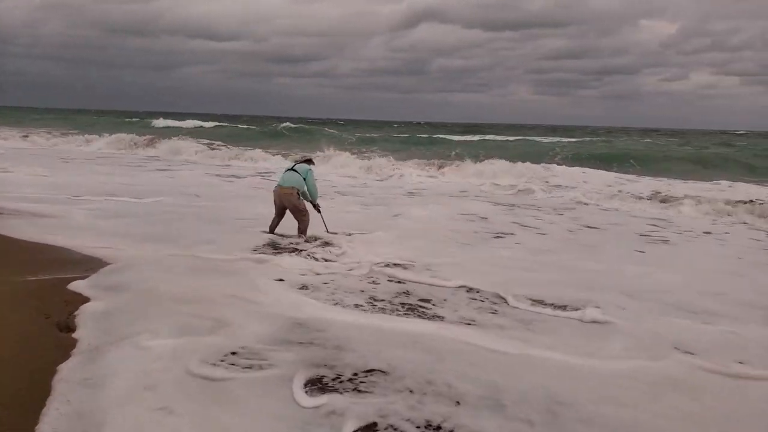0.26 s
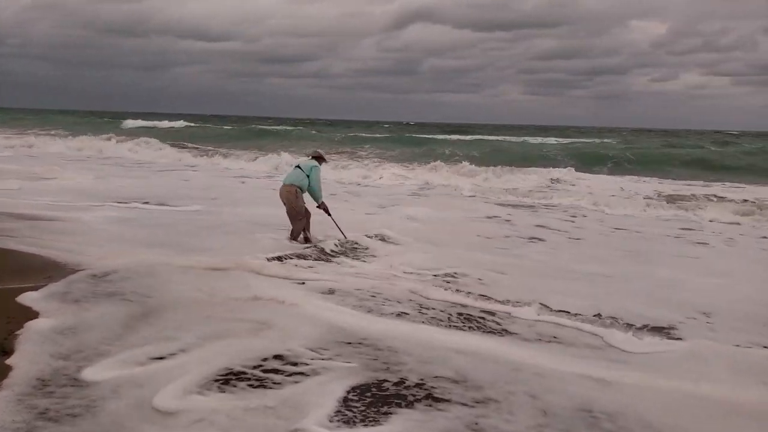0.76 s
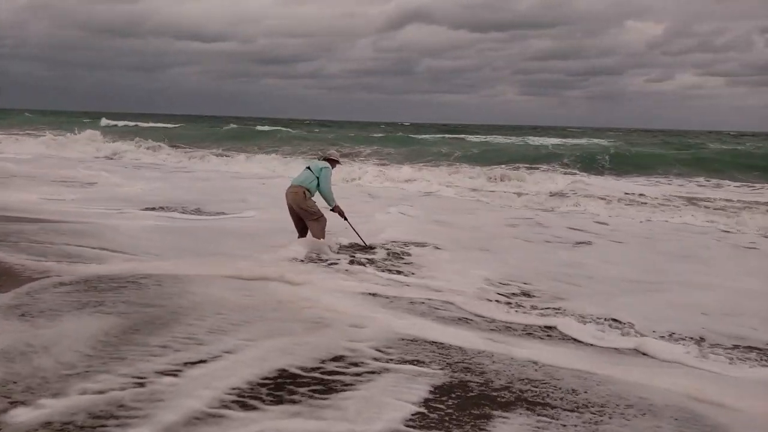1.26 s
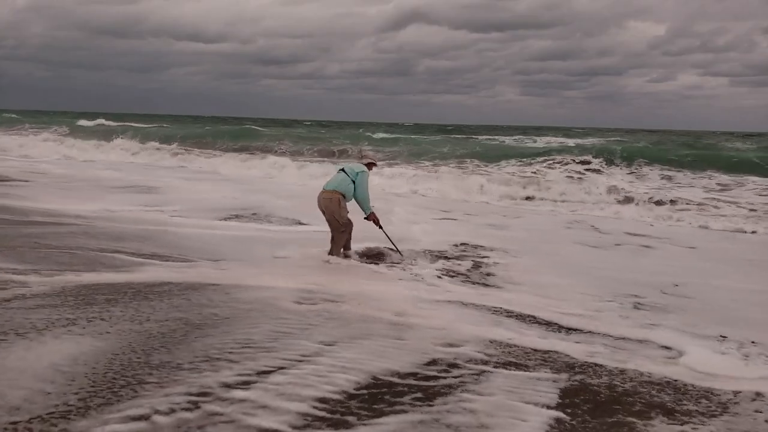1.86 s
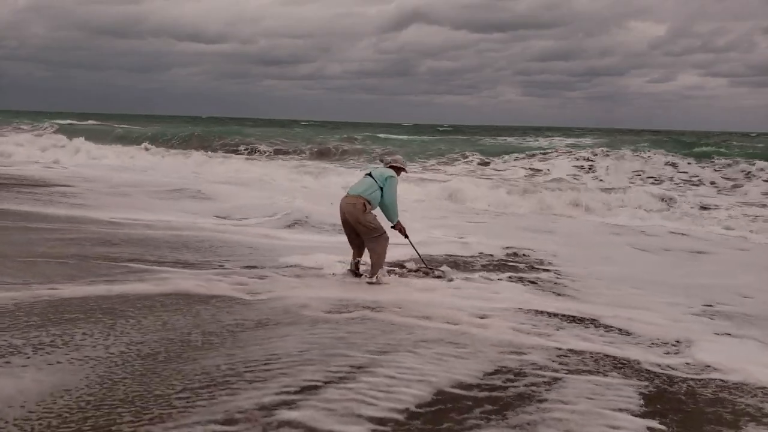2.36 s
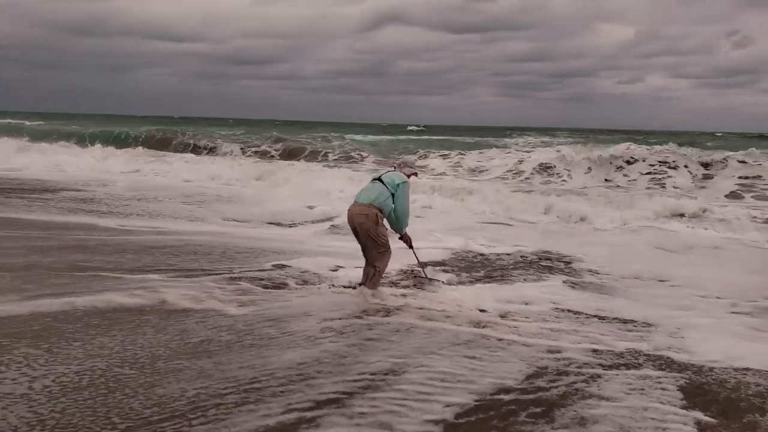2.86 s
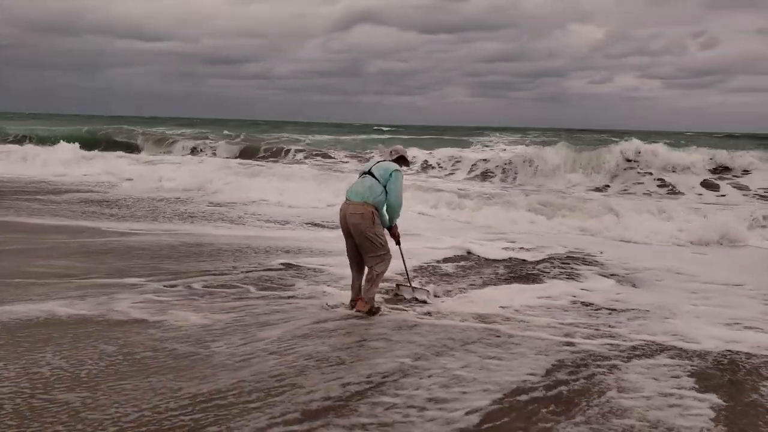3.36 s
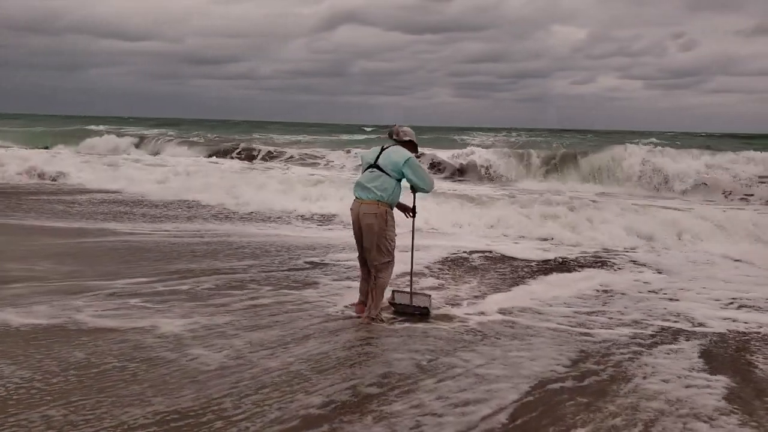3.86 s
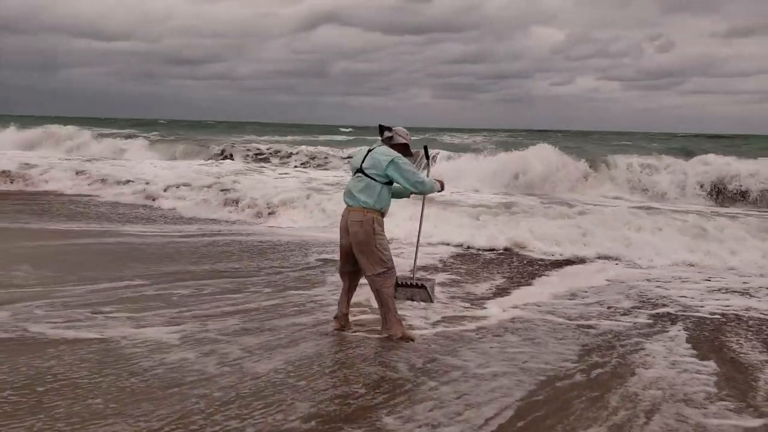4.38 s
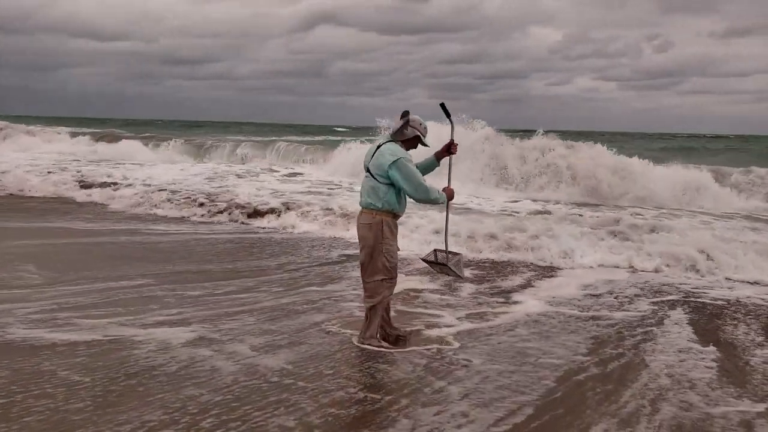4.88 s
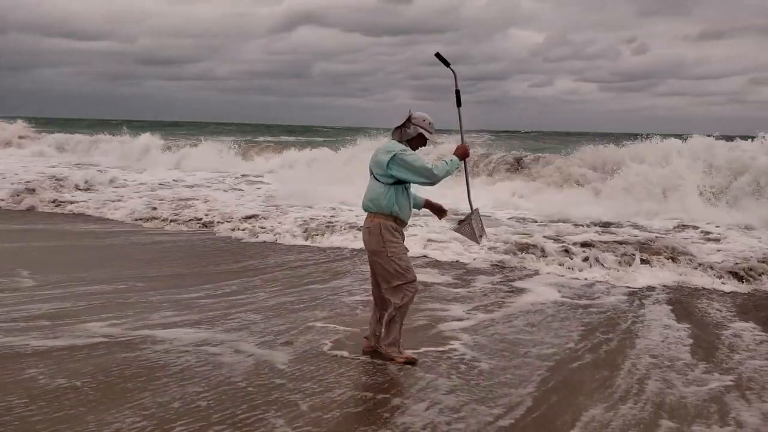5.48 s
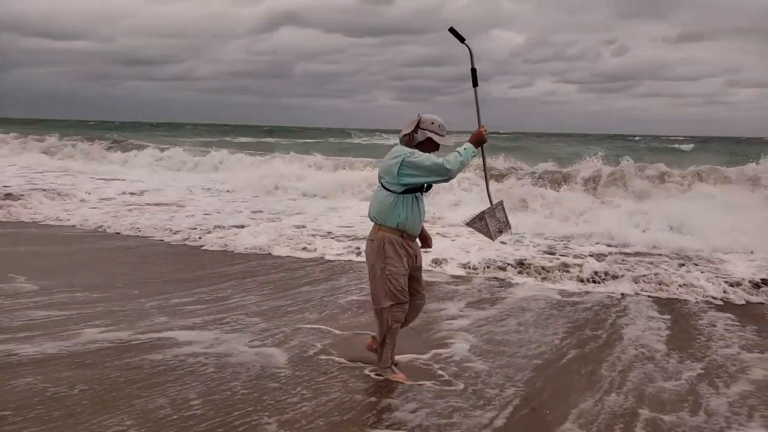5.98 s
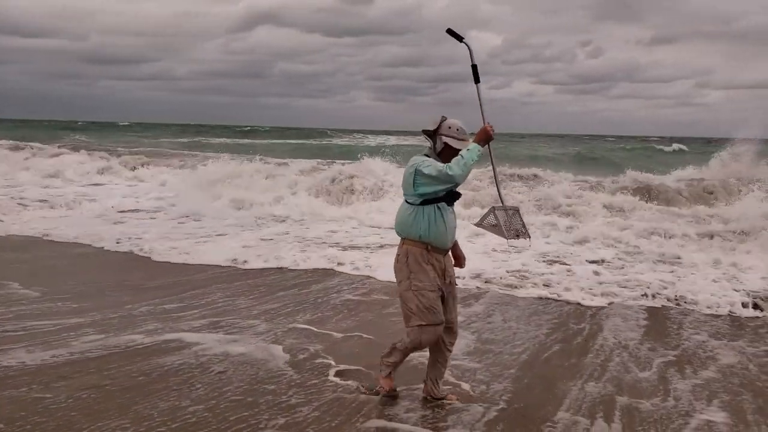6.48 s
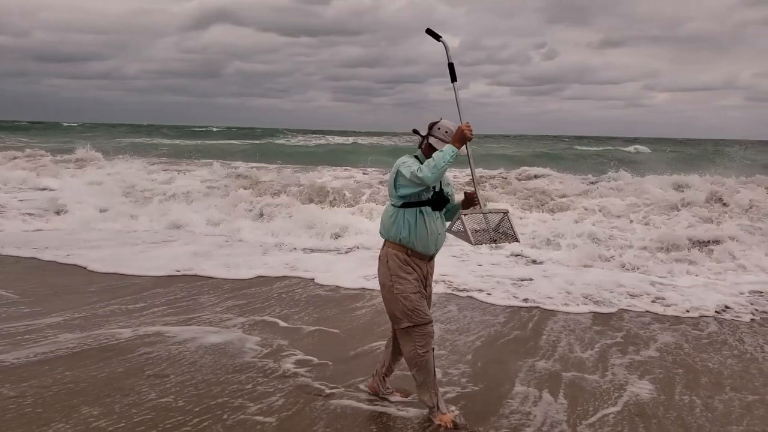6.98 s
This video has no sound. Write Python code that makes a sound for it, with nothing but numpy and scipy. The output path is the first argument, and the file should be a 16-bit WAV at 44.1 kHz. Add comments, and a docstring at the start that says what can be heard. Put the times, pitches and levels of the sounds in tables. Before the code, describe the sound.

Outdoor stereo on a beach, with wind striking a bare camera microphone. From 0 to about 1.2 s a dense, harsh, nearly saturated gust tears at the right channel, surging with tiny dropouts; the left carries mainly low rumble and faint surf. The gust releases suddenly. Until about 2.4 s a hollow, airy low-mid note fades slowly on the right beneath a fine crackling flutter, over soft rumble, with small thumps after 2 s. It is quietest around 2.6 s. From 2.8 to 3.9 s the wind turns head-on, bringing buffets to both sides. A wave gathers from 3.3 s, roaring and crackling strongest near 5.5 s, its bright foam hissing up the sand and easing afterward. Dense knocks, thumps and sharp right-side snaps cluster from 5.3 to 5.9 s, hit hard again at 6.3 s, and continue irregularly to about 7.2 s. Occasional tiny drops tick on the housing.

```python
"""Strong wind on a camera's two microphone ports, on a beach with breaking surf.
A gust, a dense stream of pressure dips, tears across the right port for the first second, then eases to
a flutter of small eddies over a low rumble of filtered noise; a hollow note lingers for a while.
A wave breaks and its foam hisses up the sand, both built from countless bubble clicks, while the wind
turns head-on and buffets both ports in surges, with knocks, thumps and sharp snaps."""
import sys
import numpy as np
from scipy import signal
from scipy.fft import rfft, irfft, next_fast_len
from scipy.io import wavfile
from scipy.ndimage import uniform_filter1d

SR = 44100
rng = np.random.default_rng(int(sys.argv[2]) if len(sys.argv) > 2 else 0)


def master_out(mix):
    """Clip the mix to full scale and print it as 16-bit PCM to the path in sys.argv[1]."""
    frames = np.transpose(np.atleast_2d(mix))
    ceiling = np.clip(frames, -1, 1)
    pcm = np.round(ceiling * 32767).astype(np.int16)
    wavfile.write(sys.argv[1], SR, pcm)


N = 319014
TIME = np.arange(N) / SR
GUST_END_S, GUST_RELEASE_S = 1.165, 0.012  # when the opening gust lets go, and how fast

# spectrum of whirls in head-on wind and in the wakes of large eddies: [f/Hz, level/dB]
BUFFET_SPECTRUM = [(60, -32), (250, -8), (420, -3), (580, -5.5), (780, 1.5), (1000, -3), (1400, -12.5),
                   (2500, -18), (6000, -64)]
# spectrum of a drop ticking on the housing: [f/Hz, level/dB]
DROP_SPECTRUM = [(500, -36), (2000, 11), (5000, 12), (8600, -11), (11500, 0), (15800, -17)]


def undb(db):
    """Decibels to gain."""
    return 10 ** (np.asarray(db) / 20)


def port_gains(db, pan_db):
    """Gains of the left and right port, pan_db (left minus right) apart around a middle level."""
    return undb(db + np.array([[pan_db], [-pan_db]]) / 2)


def unit(x):
    """Scale to rms 1."""
    return x / np.sqrt(np.mean(x ** 2))


def even(x, span_s):
    """Hold a sound at a steady strength over spans of this length; its fine grain stays."""
    power = uniform_filter1d(x ** 2, max(int(span_s * SR), 2))
    return x / np.sqrt(power + 1e-6)


def colour(x, points, ring=0):
    """Filter to a (Hz, dB) spectrum at rms 1; ring 0 keeps pulses symmetric, ring 1 lets them ring on after."""
    hz, db = np.transpose(points)
    size = next_fast_len(N)
    f = np.maximum(np.abs(np.fft.fftfreq(size, 1 / SR)), 1)
    gain = undb(np.interp(np.log(f), np.log(hz), db))
    # the Hilbert transform of the log gain is the minimum phase
    log_gain = signal.hilbert(np.log(gain))[:size // 2 + 1]
    response = np.exp(log_gain.real - 1j * ring * log_gain.imag)
    return unit(irfft(rfft(x - x.mean(), size) * response, size)[:N])


def walk(rate):
    """Smooth chance that changes about rate times a second; rms 1."""
    k = max(int(SR / rate), 2)
    levels = np.clip(rng.standard_normal(N // k + 2), -2, 2)
    steps = np.repeat(levels, k)[rng.integers(k):]
    return unit(uniform_filter1d(steps, k)[:N])


def flicker(rate, depth_db):
    """A gain that wanders at random; rms 1."""
    return unit(undb(depth_db * walk(rate)))


def curve(table):
    """Join (s, value) rows by straight lines."""
    return np.interp(TIME, *np.transpose(table))


def ramp(start_s, length_s):
    """Rise from 0 to 1."""
    return np.clip((TIME - start_s) / length_s, 0, 1)


def swells(rows, squareness):
    """A dB curve from (s, width at half height s, dB) swells; higher squareness gives steeper flanks."""
    grid = TIME[::SR // 1000]
    db = sum(db / (1 + np.abs(2 * (grid - s) / length) ** (2 * squareness)) for s, length, db in rows)
    return np.interp(TIME, grid, db)


def vortices(rate, core_ms, core_spread, spread_db):
    """Whirls drift over a port; each low-pressure core is a bell-shaped dip, briefer for a smaller whirl."""
    count = int(rate * N / SR)
    at = rng.integers(0, N, count)
    size, core = np.clip(rng.standard_normal((count, 2)), -2.2, 2.2).T
    taps = np.arange(-128, 129)
    # samples from the centre of a dip to half its depth
    radius = SR / 1000 * np.broadcast_to(core_ms, N)[at] * np.exp(core_spread * core)
    bells = np.hanning(len(taps)) / (1 + (taps / radius[:, None]) ** 2)
    dips = -undb(spread_db * size)[:, None] * bells
    return np.bincount(((at[:, None] + taps) % N).ravel(), dips.ravel(), N)


def bubbles(rate, spread_db):
    """Countless bursting bubbles: tiny clicks, a few of them larger."""
    count = int(rate * N / SR)
    size = undb(spread_db * np.minimum(rng.exponential(size=count), 5)) * rng.standard_normal(count)
    return np.bincount(rng.integers(0, N, count), size, N)


def swing(turns, cycles, phases):
    """The pressure swing of one passing eddy, some cycles long, with its own phase at each port."""
    return -np.cos(2 * np.pi * turns + phases[:, None]) * np.exp(-(turns / cycles) ** 2)


def surf(wind_db, roar_right_db=-2, foam_right_db=-2.5, wind_hiss_left_db=-26, wind_hiss_right_db=-37):
    """The breaker roars as it folds over, froth crackles, foam fizzes up the sand; wind adds to the hiss."""
    # the wave breaks and runs up the sand, as at the left port:
    # [t/s, breaker roar level/dB, froth crackle level/dB, foam hiss level/dB]
    wave = [(1.2, -54.5, -57, -60), (2.4, -55, -58.5, -64), (3.25, -52, -55.5, -63),
            (3.6, -46.5, -53.5, -58.5), (4.0, -43, -49, -53.5), (4.5, -40, -47, -52),
            (4.85, -40, -42.5, -49), (5.5, -37, -41.5, -47), (6.2, -41, -48, -50.5),
            (7.2, -41.5, -50.5, -55.5)]
    # spectra of the three layers: [f/Hz, level/dB]
    roar_spectrum = [(40, -15), (200, -10.5), (500, 0), (850, 9), (1300, 5), (2000, -6.5), (3700, -14),
                     (7000, -46)]
    froth_spectrum = [(700, -12), (1600, -1), (2600, 1), (3500, 0.5), (4200, -3.5), (5000, -11),
                      (7000, -26.5), (8600, -49)]
    foam_spectrum = [(1500, -30), (5000, -0.5), (7200, -2), (8600, -9), (10000, -4.5), (11200, 0.5),
                     (13500, 3), (15800, -4.5)]
    s, *columns = np.transpose(wave)
    roar, froth, foam = (undb(np.interp(TIME, s, c)) for c in columns)
    left = (0, 0, wind_hiss_left_db)
    right = (roar_right_db, foam_right_db, wind_hiss_right_db)
    out = []
    for roar_db, foam_db, hiss_db in (left, right):
        body = colour(bubbles(rate=14000, spread_db=3.5), roar_spectrum) * flicker(rate=24, depth_db=2.9)
        crackle = colour(bubbles(rate=5000, spread_db=3.0), froth_spectrum) * flicker(rate=27, depth_db=1.8)
        fizz = colour(bubbles(rate=18000, spread_db=0.5), foam_spectrum) * flicker(rate=33, depth_db=1.2)
        breaker = undb(roar_db) * (roar * body + froth * crackle)
        hiss = np.hypot(foam * undb(foam_db), undb(wind_db + hiss_db))  # foam and wind add in power
        out.append(breaker + hiss * fizz)
    return np.array(out)


def mist():
    """Fine drops land about fifty times a second."""
    return colour(bubbles(rate=50, spread_db=4), DROP_SPECTRUM, ring=1)


def spray(mist_db=-68, tick_s=0.011):
    """Wind-borne drops tick on the housing: a few clear decaying ones, and many fine ones to windward."""
    # clear drops: [t/s, level/dB, left minus right/dB]
    clear_drops = [(1.416, -46, -16), (3.065, -40, 5), (4.215, -39, 5)]
    grain = colour(rng.standard_normal(N), DROP_SPECTRUM) / 2
    out = np.zeros((2, N))
    for s, db, pan_db in clear_drops:
        near = slice(int(s * SR), int(s * SR) + SR // 50)
        tick = grain[near] * np.exp((s - TIME[near]) / tick_s)
        out[:, near] += tick * port_gains(db, pan_db)
    out[1] += undb(mist_db) * mist()
    return out


def pressure(head_on, deep_hz=47, deep_loss_db=16):
    """Slow pressure swings at one port; head-on wind loses those below deep_hz."""
    # rumble spectrum: [f/Hz, level/dB]
    rumble_spectrum = [(15, -28), (30, -2.5), (60, 0), (90, 1), (130, 0), (170, -2), (250, -5), (400, -9),
                       (600, -22.5), (1000, -39), (2000, -67), (5000, -79)]
    swings = colour(rng.standard_normal(N), rumble_spectrum)
    upper = signal.sosfiltfilt(signal.butter(2, deep_hz, "high", fs=SR, output="sos"), swings)
    return upper + (swings - upper) * undb(-deep_loss_db * head_on)


def rumble(wind_db, head_on, left_db=5, right_db=4.0, lift_off_db=-37.0, lift_off_slope=1.0, full_db=-39):
    """Large slow eddies press on each port; on the right they come in lumps and die away in weak wind."""
    left = undb(wind_db + left_db) * pressure(head_on) * flicker(rate=45, depth_db=3.0)
    lumps = unit(1 + np.tanh(2.2 * walk(30)))
    # the right port stops growing in strong wind and falls faster in weak wind
    reach_db = np.minimum(wind_db, full_db) - lift_off_slope * np.maximum(lift_off_db - wind_db, 0)
    right = undb(reach_db + right_db) * pressure(head_on) * lumps
    return np.array([left, right])


def knocks(cycles=0.68, phase_spread=1.34, level_db=-1):
    """Slower eddies land on the ports as dull knocks, each a short pressure swing."""
    # slower eddies: [t/s, level before level_db/dB, pitch f/Hz, left minus right/dB]
    slow_eddies = [(0.97, -16, 132, 15.5), (3.563, -29, 92, 1), (3.845, -29, 100, 5), (4.274, -23, 159, 8),
                   (4.58, -23.5, 171, 0), (4.746, -20, 150, -2), (4.892, -22, 181, -1),
                   (5.038, -20, 192, 2), (5.137, -23.5, 204, -11), (5.453, -18, 241, 4),
                   (5.492, -20, 110, 1), (5.625, -30, 170, -3), (5.67, -23.5, 233, -5),
                   (5.856, -25, 190, 2), (6.317, -17.5, 226, 7), (6.335, -23, 131, -2),
                   (6.435, -25, 188, -5), (6.527, -31, 170, 17), (6.727, -23.5, 178, 2),
                   (6.918, -14.5, 223, -1), (6.979, -25.5, 151, -6), (7.119, -29, 130, 8)]
    out = np.zeros((2, N))
    chances = rng.standard_normal((len(slow_eddies), 2))
    for (s, db, pitch_hz, pan_db), chance in zip(slow_eddies, chances):
        near = slice(int(s * SR) - SR // 20, int(s * SR) + SR // 20)
        knock = swing((TIME[near] - s) * pitch_hz, cycles, phase_spread * chance)
        out[:, near] += knock * port_gains(level_db + db, pan_db)
    return out


def thumps(body_hz=190, body_db=-16, wake_s=0.016, phase_spread=0.61, level_db=0.0):
    """A large eddy hits both ports: quick pressure swings on a slower one, then a short turbulent wake."""
    # large eddies: [t/s, level/dB, pitch f/Hz, length/cycles, wake relative to level/dB, left minus right/dB]
    large_eddies = [(2.018, -37, 450, 1, -6, -16), (2.246, -34.5, 570, 1.7, -8, -16),
                    (2.385, -39, 500, 1, -3, -16), (3.551, -24.5, 606, 0.5, -5.5, -8),
                    (3.8, -32, 600, 0.72, -14, -2), (3.951, -19.5, 645, 0.75, -12, -1),
                    (4.25, -28, 850, 1.4, -18, -9), (4.578, -28, 600, 0.69, -4, -4),
                    (4.797, -23, 690, 1.1, -3.5, -1), (4.836, -26, 990, 1.7, -10, -2),
                    (4.884, -25, 845, 1.3, -3.5, -10), (5.083, -20, 890, 1.3, -9.5, -3),
                    (5.099, -23, 850, 1.3, -16, -8), (5.263, -20.5, 675, 1.2, -4.5, -9),
                    (5.318, -11, 700, 1.0, -12.5, -5), (5.385, -26, 616, 0.81, -1, -6),
                    (5.448, -19.5, 465, 1.6, -4.5, -7), (5.459, -23, 655, 2.4, -14, 1),
                    (5.488, -18.5, 623, 0.64, -6, -6), (5.493, -17.5, 870, 1.3, -18, -13),
                    (5.537, -20.5, 886, 0.8, -2, -4), (5.569, -15, 750, 1.2, -10, -1),
                    (5.582, -22.5, 850, 1.1, -7, -6), (5.595, -16, 720, 0.69, -27, 12),
                    (5.653, -18, 840, 1.1, -5.5, -2), (5.669, -21.5, 402, 0.92, -7, -1),
                    (5.703, -26.5, 650, 0.89, -4, -3), (6.215, -25, 750, 1.4, -11, -2),
                    (6.317, -12.5, 810, 0.63, -15.5, 1.5), (6.348, -21.5, 650, 0.65, -15, 2),
                    (6.423, -24, 700, 0.82, -7, 1), (6.461, -25, 750, 2.4, -5, -7),
                    (6.536, -27.5, 990, 1.1, -5, -12), (6.686, -29.5, 930, 1.2, -17, -10),
                    (6.746, -19.5, 1060, 0.51, -24, -11), (6.771, -20.5, 680, 0.81, -6, -3),
                    (6.892, -23, 900, 1.5, -25, -9), (6.921, -26, 556, 1.3, -3.5, -4),
                    (7.042, -26.5, 880, 1.1, -13, -1)]
    out = np.zeros((2, N))
    wakes = np.array([colour(rng.standard_normal(N), BUFFET_SPECTRUM) for _ in range(2)])
    chances = rng.standard_normal((len(large_eddies), 2))
    for (s, db, pitch_hz, cycles, wake_db, pan_db), chance in zip(large_eddies, chances):
        near = slice(int(s * SR) - SR // 100, int(s * SR) + SR // 10)
        t = TIME[near] - s
        quick = swing(t * pitch_hz, cycles, phase_spread * chance)  # nearly in step at the two ports
        slow = swing(t * body_hz, 0.52, chance)
        wake = (t > 0) * np.exp(-np.abs(t) / wake_s) * wakes[:, near]
        thump = quick + undb(body_db) * slow + undb(wake_db) * wake
        out[:, near] += thump * port_gains(level_db + db, pan_db)
    return out


def buffeting(wind_db, left_db=-1, right_db=1):
    """Head-on wind comes in quick bursts that reach both ports together, each with its own whirls."""
    bursts = even(flicker(rate=80, depth_db=5.5), 0.13)
    ports = []
    for _ in range(2):
        whirls = vortices(rate=1500, core_ms=0.19, core_spread=0.61, spread_db=6.5)
        ports.append(colour(whirls, BUFFET_SPECTRUM, ring=0.53))
    return np.array(ports) * undb(wind_db) * bursts * undb([[left_db], [right_db]])


def hollow(start_db=-36, sag_db_per_s=1.5, end_s=2.414, release_s=0.022, hold_s=0.11):
    """After the gust, grazing air blows a hollow note in the right port: a band of noise that slowly fades."""
    # hollow note spectrum: [f/Hz, level/dB]
    hollow_spectrum = [(180, -31), (260, -16), (330, 3), (450, 2), (600, -1.5), (900, -17), (2000, -53)]
    level = undb(start_db - sag_db_per_s * (TIME - GUST_END_S))
    held = ramp(GUST_END_S, GUST_RELEASE_S) - ramp(end_s, release_s)
    note = colour(rng.standard_normal(N), hollow_spectrum) * flicker(rate=44, depth_db=2.0)
    return level * held * even(note, hold_s)


def snaps(trail_ms=4.1, trail_db=-17, level_db=1):
    """A tight whirl crosses the right port as one sharp pressure dip, with a few ms of ragged air behind."""
    # tight whirls: [t/s, level relative to one another/dB]
    tight_whirls = [(2.243, -23.5), (3.996, -21), (4.205, -22), (5.464, -14.5), (5.468, -13), (5.490, -13),
                    (5.527, -22), (5.538, -15), (5.703, -14), (5.717, -19), (5.742, -12), (5.751, -20),
                    (5.835, -25), (5.902, -15), (5.968, -32), (6.049, -18.5), (6.294, -14), (6.304, -17.5),
                    (6.358, -16), (6.834, -16), (7.008, -19), (7.187, -17)]
    # snap spectrum: [f/Hz, level/dB]
    snap_spectrum = [(150, -20), (500, -7), (900, 8), (2000, -1), (4000, -10), (6000, -18.5), (8500, -43)]
    out = np.zeros(N)
    t = TIME[:SR // 50]
    for (s, db), air in zip(tight_whirls, rng.standard_normal((len(tight_whirls), len(t)))):
        trail = undb(trail_db) * air * np.exp(-1000 * t / trail_ms)
        dip = trail - (t == 0)
        out[int(s * SR):][:len(t)] += undb(db) * dip
    shaped = colour(out, snap_spectrum, ring=0.4)
    # the highest peak lands level_db above the strongest row
    return shaped / np.abs(shaped).max() * undb(level_db + max(db for _, db in tight_whirls))


def flutter(sideways_db, level_db=-38.0, afterblow_db=4, settle_s=0.085, hold_s=0.07):
    """Lighter air patters on the right port in a fine, unbroken crackle of whirls, settling after the gust."""
    # flutter spectrum: [f/Hz, level/dB]
    flutter_spectrum = [(40, -69), (250, -25), (420, -4), (580, -8), (780, -1), (1300, -1), (2200, -2),
                        (4000, -3), (6500, -7.5), (8500, -15), (15000, -21)]
    whirls = vortices(rate=1400, core_ms=0.12, core_spread=0.47, spread_db=2.0)
    crackle = colour(whirls, flutter_spectrum, ring=0.38) * flicker(rate=130, depth_db=2.0)
    patter = even(crackle, hold_s)
    settling_db = afterblow_db * np.exp(-np.maximum(TIME - GUST_END_S, 0) / settle_s)
    return undb(level_db + settling_db + sideways_db) * patter


def gust(blowing, sideways_db, lull_db, lull_dulling=1.0, port_hz=5700):
    """A dense stream of whirls tears across the right port; faster air makes smaller, brighter ones."""
    # gust spectrum: [f/Hz, level/dB]
    gust_spectrum = [(30, -39), (120, -21), (220, -14), (310, -3), (420, 0), (800, 1), (2000, 2), (3600, 1),
                     (5000, -5.5), (6500, -14), (8500, -5)]
    base_db, ceiling = -16.5, 1.02  # level between surges ahead of saturation, and its limit
    base_core_ms, core_halving_db = 0.16, 7.5  # typical core between surges, halved by each such rise
    level = blowing * undb(base_db + sideways_db - lull_db)
    core_ms = base_core_ms / 2 ** ((sideways_db - lull_dulling * lull_db) / core_halving_db)
    whirls = vortices(rate=1400, core_ms=core_ms, core_spread=0.4, spread_db=1.5)
    tearing = even(colour(whirls, gust_spectrum, ring=0.21), 0.077)
    squashed = ceiling * np.tanh(level * tearing / ceiling)  # the strongest swings saturate
    narrow_port = signal.butter(4, port_hz, fs=SR, output="sos")  # dulls them
    return signal.sosfilt(narrow_port, squashed)


def scene(lull_share=0.3, rumble_share=0.39, hiss_share=1.0, head_on_rumble_db=0.5):
    """Sea and wind at the two ports; as the wind turns head-on, its deepest rumble gives way to buffets."""
    # wind strength between surges, before the gust's rise: [t/s, level/dB]
    wind = [(1.2, -46), (1.5, -48), (2.0, -47.5), (2.6, -51.5), (3.3, -46.5), (4.2, -42.5), (4.8, -39.5),
            (5.6, -39.5), (6.15, -42.5), (6.9, -41), (7.2, -40.5)]
    # surges of wind: [t/s, length/s, head-on rise/dB, sideways rise/dB]
    surges = [(0.255, 0.11, 9, -1), (0.408, .15, 5, 4), (0.322, 0.027, 0, 3.5), (0.401, 0.008, -6, 2),
              (0.605, 0.13, 9, 4.5), (0.607, 0.021, -5, 1.5), (0.804, 0.067, -3, 5.5),
              (0.735, 0.039, -7, 2.5), (0.885, 0.037, 9, 4), (0.932, 0.0093, 8, 4), (0.978, 0.097, 5, -2.5),
              (1.03, 0.0048, -2, 8), (1.354, 0.15, 1, 3), (2.14, 0.1, 0, 3), (2.687, 0.031, 5, 3),
              (2.975, 0.28, 7.5, 1.5), (3.434, 0.062, 8, 2.5), (3.605, 0.1, 2.5, 4),
              (3.835, 0.038, 7.5, -6), (4.046, 0.19, 0, 7.5), (4.317, 0.069, 3, 5), (4.584, 0.026, 6.5, -9),
              (4.672, 0.041, -2, 9.5), (4.78, 0.099, 7.5, 2.5), (5.313, 0.095, 6.5, -6),
              (5.477, 0.067, -11, 7.5), (5.624, 0.21, 7, 3), (5.731, 0.09, -5, 5.5),
              (5.905, 0.23, 0.5, 6.5), (6.344, 0.085, 11, 5), (6.45, 0.049, 3, 5.5), (6.8, 0.16, 2, 7),
              (6.963, 0.11, 6, -3)]
    # lulls, when the stream lifts off the right port: [t/s, length/s, depth/dB (negative: a rise)]
    lulls = [(0.094, 0.008, 2), (0.188, 0.0065, 2), (0.205, 0.0076, 7), (0.259, 0.021, 2),
             (0.298, 0.016, 2), (0.634, 0.0078, 2), (.672, 0.0063, 10.5), (.851, 0.008, 6), (0.91, 0.01, 3),
             (0.99, 0.022, 1), (1.038, 0.011, 3), (1.836, 0.028, 12), (3.25, 0.19, 1.5), (3.508, 0.071, 5),
             (3.73, 0.068, 4.5), (4.69, 0.039, 20), (5.19, 0.088, 3), (4.96, 0.054, 6), (6.15, 0.089, 9),
             (5.36, 0.03, 2), (5.512, 0.016, 8), (5.614, 0.022, 8), (5.81, 0.04, 4.5), (6.26, 0.035, -2),
             (6.645, 0.025, -2.5), (6.88, 0.059, 6)]
    gust_rise_db = 10.5
    turn_start_s, turn_end_s = 2.77, 3.9  # the wind turns from sideways to head-on
    blowing = 1 - ramp(GUST_END_S, GUST_RELEASE_S)
    head_on = ramp(turn_start_s, turn_end_s - turn_start_s)
    steady_db = curve(wind) + gust_rise_db * blowing
    surge_db = swells([(s, length, db) for s, length, db, _ in surges], squareness=8.9)
    sideways_db = swells([(s, length, db) for s, length, _, db in surges], squareness=2.0)
    lull_db = swells(lulls, squareness=6.1)

    sea = surf(steady_db + hiss_share * surge_db) + spray()
    low = rumble(steady_db + rumble_share * surge_db + head_on_rumble_db * head_on, head_on)
    buffets = head_on * buffeting(steady_db + surge_db - lull_share * lull_db)
    eddies = buffets + knocks() + thumps()
    windward = gust(blowing, sideways_db, lull_db) + flutter(sideways_db - lull_db) + hollow() + snaps()
    return sea + low + eddies + np.array([np.zeros(N), windward])  # windward is the right port


def record(dry, top_hz=15800):
    """The camera cuts the top with a steep low-pass."""
    return signal.sosfilt(signal.ellip(10, .2, 70, top_hz, fs=SR, output="sos"), dry)


dry = scene()
out = record(dry)
master_out(out)
```